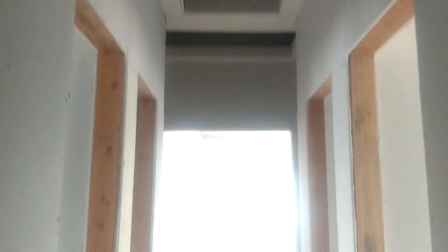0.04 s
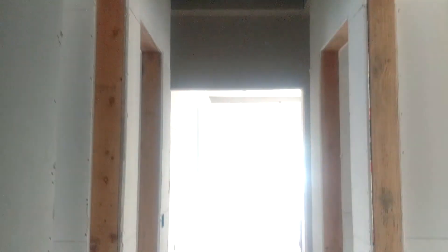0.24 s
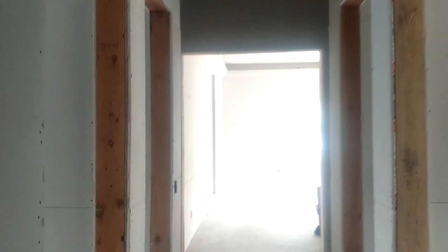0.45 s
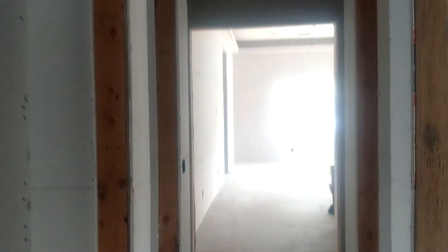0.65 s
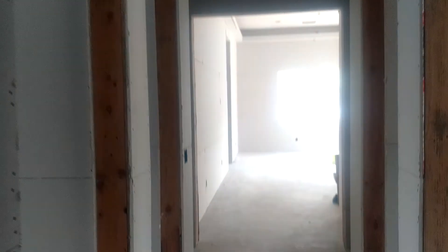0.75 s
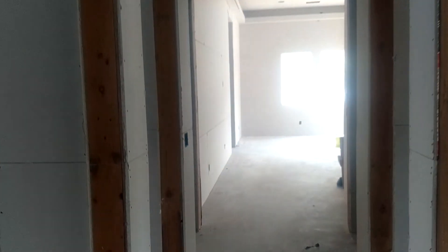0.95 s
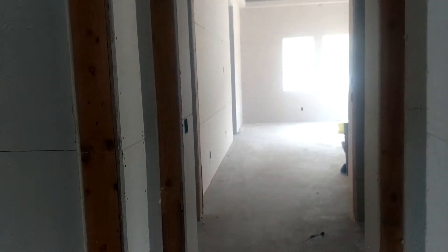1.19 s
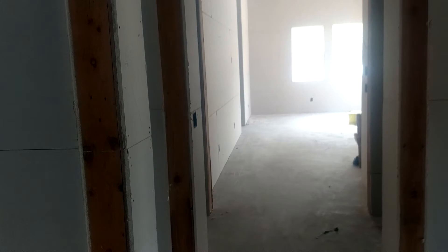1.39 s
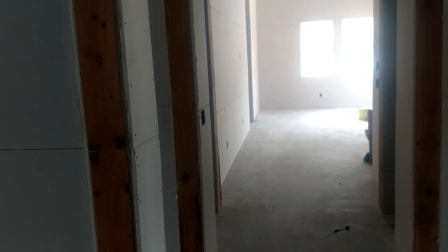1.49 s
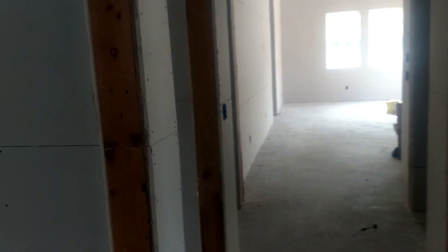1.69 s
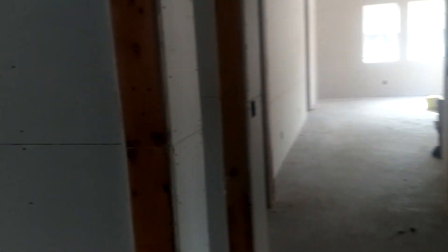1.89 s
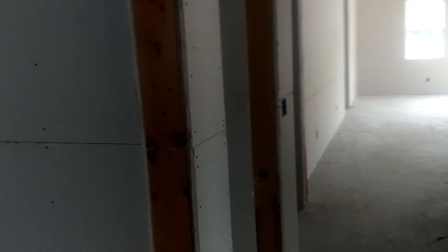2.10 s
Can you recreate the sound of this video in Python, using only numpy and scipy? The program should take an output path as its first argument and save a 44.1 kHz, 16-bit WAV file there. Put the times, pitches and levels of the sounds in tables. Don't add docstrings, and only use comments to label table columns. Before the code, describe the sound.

Two gritty footsteps on bare concrete, about 0.8 seconds apart, the first brighter, the second lower and hollower, echo through an empty house; a tiny dry double click precedes them, close to the phone microphone.

```python
import sys
import numpy as np
from scipy import signal
from scipy.fft import rfft, irfft
from scipy.io import wavfile
from scipy.ndimage import uniform_filter1d

SR = 44100
rng = np.random.default_rng(int(sys.argv[2]) if len(sys.argv) > 2 else 0)


def master_out(mix):
    frames = np.transpose(np.atleast_2d(mix))
    ceiling = np.clip(frames, -1, 1)
    pcm = np.round(ceiling * 32767).astype(np.int16)
    wavfile.write(sys.argv[1], SR, pcm)


def amplitude_ratio(level_db):
    exponent = np.asarray(level_db, float) / 20
    return 10 ** exponent


N = 94241


def shape(x, table):
    hz, db = np.array(table, float).T
    bin_hz = np.arange(513) * SR / 1024
    log_gain = np.interp(np.log(bin_hz + 1), np.log(hz), db) * np.log(10) / 20
    cepstrum = irfft(log_gain)
    cepstrum[1:512] *= 2
    cepstrum[513:] = 0
    response = irfft(np.exp(rfft(cepstrum)))
    return signal.fftconvolve(x, response)[:len(x)]


def band(x, hz, width_hz):
    return signal.lfilter(*signal.iirpeak(hz, hz / width_hz, fs=SR), x)


def narrow_band(x, hz, width_hz):
    return band(band(x, hz, width_hz), hz, width_hz)


def unit(x):
    return x / np.sqrt(np.mean(x ** 2))


def walk(rate_hz):
    hold = int(SR / rate_hz)
    steps = np.repeat(rng.standard_normal(N // hold + 1), hold)
    return 1.3 * uniform_filter1d(uniform_filter1d(steps, hold), hold)[:N]


def envelope(t, start_s, rise_s, length_s, fall_s):
    rise = np.clip((t - start_s) / rise_s, 0, 1)
    return rise * np.exp(-np.clip(t - start_s - length_s, 0, 1) / fall_s)


def ports(alike, apart):
    apart_hz, floor_db = 970, -18.5
    high = signal.lfilter(*signal.butter(1, apart_hz, "high", fs=SR), apart)
    differ = high + amplitude_ratio(floor_db) * apart
    return np.array([alike + differ, alike - differ]) / np.sqrt(2)


def grains(scatter_db):
    return rng.choice([-1, 1], N) * amplitude_ratio(scatter_db * rng.exponential(size=N))


def feet(t):
    # start_s, grit_db, knock_db, slide_s
    contacts = [(0.947, -31.5, -38, 0.0065), (0.952, -23.5, -47, 0.0047), (0.956, -33.5, -41.5, 0.026),
                (.979, -29.5, -32.5, 0.003), (0.988, -37, -26, 0.0038), (0.998, -39.5, -44.5, 0.035),
                (1.035, -35, -36, 0.018), (1.063, -45, -57, 0.12), (1.7178, -43, -30, 0.00096),
                (1.7213, -28.5, -24, 0.0053), (1.735, -35.5, -28, 0.008), (1.744, -31.5, -29.5, .013),
                (1.764, -29, -32, 0.0049), (1.776, -41, -29, 0.0081), (1.791, -59, -49.5, 0.02),
                (1.819, -42, -48, 0.0029)]
    # start_s, grit_db, knock_db, slide_s
    shuffles = [
        (.01, -89, -64.5, 0.087),
        (0.292, -59, -70, 0.034),
        (0.373, -62, -54, 0.004),
        (0.412, -79, -56.5, 0.0057),
        (0.495, -63, -56, 0.02),
        (.534, -55, -75, .001),
        (.6, -70, -76.5, 0.064),
        (1.42, -64, -60.5, 0.057),
    ]
    # pitch_hz, level_db
    grit_colour = [(300, -21), (1200, -18.5), (2500, -7), (4500, -8), (7000, -6.5), (9500, -14),
                   (12500, -20.5), (16000, -27)]
    # pitch_hz, width_hz, level_db
    soles = [
        [(840, 290, 3.5), (972, 470, 2.5), (3450, 200, 0), (2150, 540, 2.5)],
        [(648, 126, -1), (775, 200, 0), (970, 440, 2.5), (1290, 300, -6.5), (1590, 760, -3)],
    ]
    rise_s, fall_s, second_foot_s = 0.00063, 0.0039, 1.6

    grit_drive, knock_drive = np.zeros(N), np.zeros(N)
    for start_s, grit_db, knock_db, slide_s in contacts + shuffles:
        on = envelope(t, start_s, rise_s, slide_s, fall_s)
        grit_drive += amplitude_ratio(grit_db) * on
        knock_drive += amplitude_ratio(knock_db) * on

    grit, knock = grains(3.2), grains(1.5)
    out = shape(grit * grit_drive, grit_colour) / np.std(shape(grit, grit_colour))

    def ring(x, sole):
        return sum(amplitude_ratio(db) * band(band(x, hz, 1.8 * width_hz), hz, width_hz) for hz, width_hz, db in sole)

    for sole, down in zip(soles, (t < second_foot_s, t >= second_foot_s)):
        out = out + ring(knock * knock_drive * down, sole) / np.std(ring(knock, sole))
    return out


def thuds(t):
    # start_s, level_db, pitch_hz, width_hz, length_s
    bumps = [
        (0.63, -53.5, 332, 89, 0.04),
        (1.77, -31, 659, 161, 0.016),
        (0.959, -51, 332, 94.5, 0.24),
        (1.421, -56, 371, 162, 0.093),
        (1.468, -56.5, 544, 120, 0.032),
        (1.712, -42, 125, 93, 0.064),
        (1.754, -32, 269, 211, 0.042),
        (1.774, -38, 186, 99, 0.018),
    ]
    rise_s = fall_s = 0.0054
    out = np.zeros(N)
    for start_s, db, hz, width_hz, length_s in bumps:
        bump = unit(narrow_band(rng.standard_normal(N), hz, width_hz))
        out += amplitude_ratio(db) * envelope(t, start_s, rise_s, length_s, fall_s) * bump
    return out


def clicks():
    # start_s, level_db
    snaps = [
        (.8170, -14),
        (.8175, -27),
        (.8200, -20),
        (.8211, -29),
    ]
    click_hz, click_width_hz, ring_width_hz, ring_db = 10400, 9000, 900, 10
    right_db, right_lag = -15, 9
    snap = np.zeros(N)
    for start_s, db in snaps:
        snap[int(start_s * SR)] = amplitude_ratio(db)
    tick = band(snap, click_hz, click_width_hz)
    tick = tick + amplitude_ratio(ring_db) * band(snap, 0.916 * click_hz, ring_width_hz)
    return np.array([tick, amplitude_ratio(right_db) * np.roll(tick, shift=right_lag)])


def rustles(t):
    # start_s, level_db, length_s
    brushes = [
        (.0, -64, 0.044),
        (0.291, -61, .03),
        (0.36, -60, .005),
        (0.484, -65, 0.0068),
        (.635, -66, 0.035),
        (1.14, -51.5, 0.019),
        (1.209, -51.5, .004),
        (1.243, -53, .005),
        (1.367, -55.5, 0.0098),
    ]
    rise_s, fall_s = 0.0037, 0.009
    on = sum(amplitude_ratio(db) * envelope(t, start_s, rise_s, length_s, fall_s) for start_s, db, length_s in brushes)
    fibres = rng.standard_normal((2, N)) * amplitude_ratio(rng.exponential(size=(2, N)))
    return on * unit(band(fibres, 8400, 6300))


def scrape(t):
    # time_s, level_db
    drag = [
        (.45, -76),
        (.52, -70),
        (.62, -61),
        (.7, -77),
        (.8, -63.5),
        (.93, -74),
        (1.1, -72),
    ]
    # pitch_hz, width_hz, level_db
    resonances = [(2790, 560, 0.5), (3210, 530, -6), (4540, 1200, -4), (1270, 370, -2.5)]
    hiss = np.zeros(N)
    for hz, width_hz, db in resonances:
        waver_db = 0.95 * walk(19.4)
        hiss += amplitude_ratio(db + waver_db) * unit(narrow_band(rng.standard_normal(N), hz, width_hz))
    time_s, level_db = np.array(drag).T
    return hiss * amplitude_ratio(np.interp(t, time_s, level_db, left=-120, right=-120))


def hall(x):
    # pitch_hz, decay_s
    decay = [(150, 0.13), (400, 1), (1000, 0.67), (3000, 0.86), (6000, 0.65), (10000, 0.43), (15000, 0.36)]
    hall_db, build_s, early_scatter_db, early_s = -2.5, 0.002, 2, 0.027
    t = np.arange(SR) / SR
    hz, decay_s = np.array(decay).T
    lumps = amplitude_ratio(early_scatter_db * walk(181.6)[:SR] * np.exp(-t / early_s))
    cell_hz, cell_s, cells = signal.stft(rng.standard_normal((2, SR)), SR, nperseg=512)
    cell_decay_s = np.interp(np.log(cell_hz + 1), np.log(hz), decay_s)[:, None]
    fade = amplitude_ratio(-60 * cell_s / cell_decay_s)
    tails = signal.istft(cells * fade, SR, nperseg=512)[1][:, :SR]
    tails = tails * lumps * (1 - np.exp(-t / build_s))
    alike, apart = [signal.fftconvolve(x, tail / np.sqrt(np.sum(tail ** 2)))[:N] for tail in tails]
    return amplitude_ratio(hall_db) * ports(alike, apart)


def air():
    # pitch_hz, level_db
    air_colour = [(40, 5), (120, 9.5), (320, -0.5), (800, -5.5), (1500, -10), (3000, -25), (7000, -20.5),
                  (15000, -39.5)]
    air_db, swell_db, flicker_db = -52, 0.8, 2.5
    colour_hz, colour_db = np.array(air_colour, float).T
    out, swell = 0, walk(6.34)
    for hz in 45 * 2 ** np.arange(0, 8.6, 0.5):
        db = np.interp(np.log(hz), np.log(colour_hz), colour_db) + swell_db * swell + flicker_db * walk(8.86)
        out = out + amplitude_ratio(db) * narrow_band(rng.standard_normal((2, N)), hz, hz / 2)
    return amplitude_ratio(air_db) * unit(ports(*out))


def scene():
    t = np.arange(N) / SR
    dry = feet(t) + thuds(t) + scrape(t)
    direct = np.array([dry, amplitude_ratio(-1.5) * np.roll(dry, shift=-11)])
    return direct + hall(dry) + clicks() + rustles(t) + air()


def roll_off(x):
    return signal.sosfilt(signal.butter(12, 16830, fs=SR, output="sos"), x)


def record(dry):
    port_lag, cross_db, cross_top_hz = 20, -1.5, 7220
    right_db, right_top_hz = -1.5, 12500
    hiss_db, hiss_hz, low_cut_hz = -64.5, 3000, 50
    right = amplitude_ratio(right_db) * signal.lfilter(*signal.butter(1, right_top_hz, fs=SR), dry[1])
    pair = np.array([dry[0], right])
    b, a = signal.butter(3, cross_top_hz, fs=SR)
    low = signal.filtfilt(b, a, pair)
    x = pair - amplitude_ratio(cross_db) * np.roll(low[::-1], shift=port_lag, axis=1)
    hiss = signal.lfilter(*signal.butter(1, hiss_hz, "high", fs=SR), rng.standard_normal(x.shape))
    x = x + amplitude_ratio(hiss_db) * hiss
    x = signal.lfilter(*signal.butter(2, low_cut_hz, "high", fs=SR), x)
    x = signal.sosfilt(signal.ellip(6, 0.3, 24, 15700, fs=SR, output="sos"), x)
    return roll_off(x)


dry = scene()
out = record(dry)
master_out(out)
```